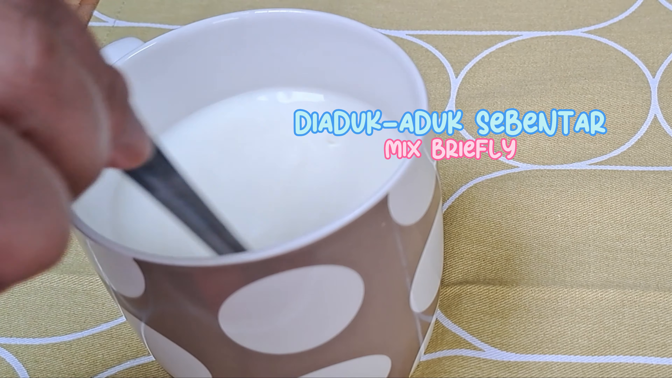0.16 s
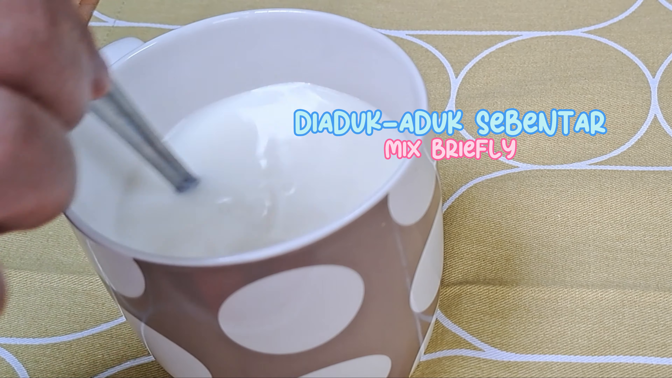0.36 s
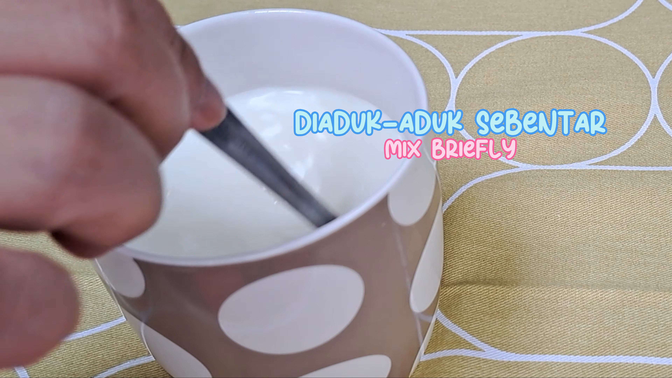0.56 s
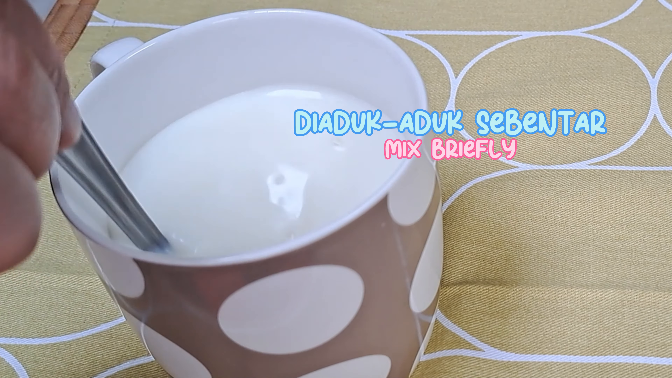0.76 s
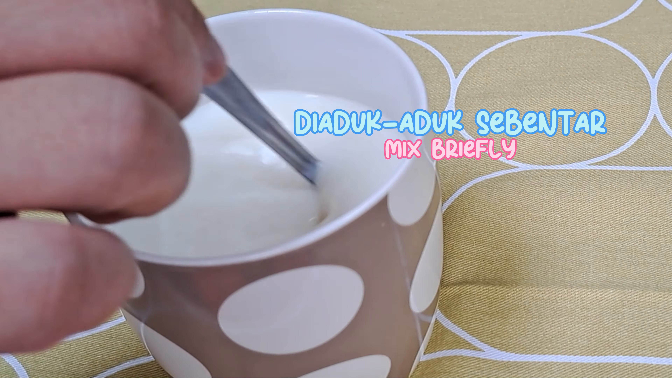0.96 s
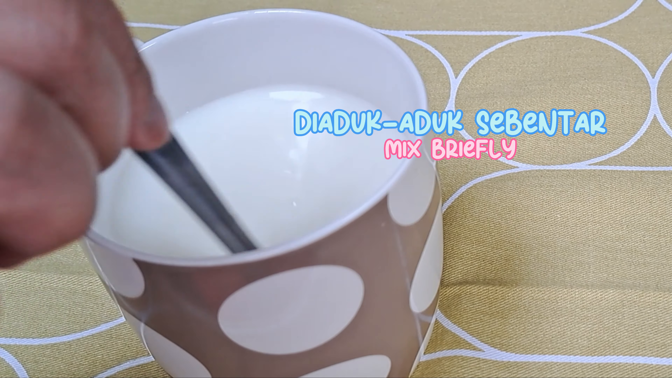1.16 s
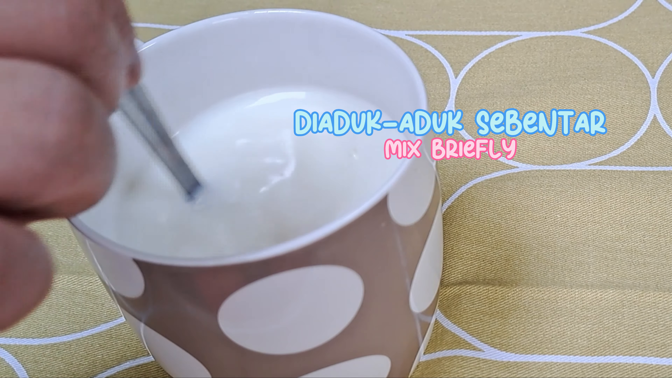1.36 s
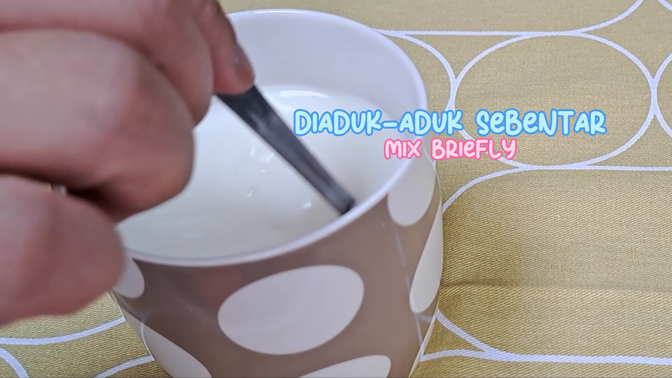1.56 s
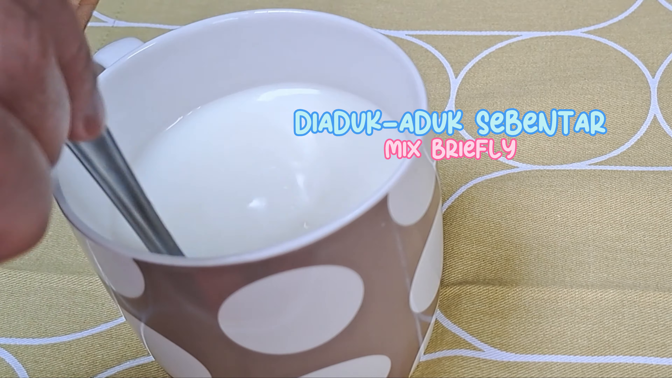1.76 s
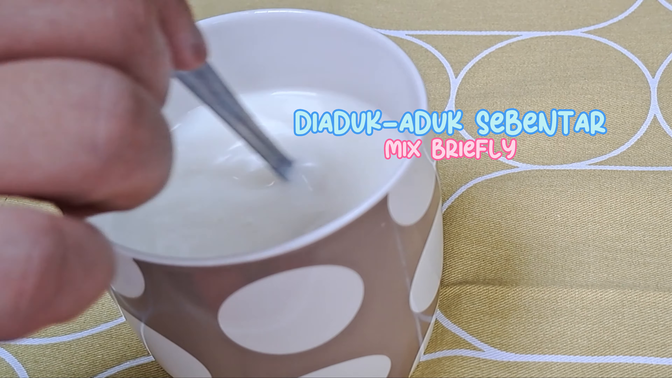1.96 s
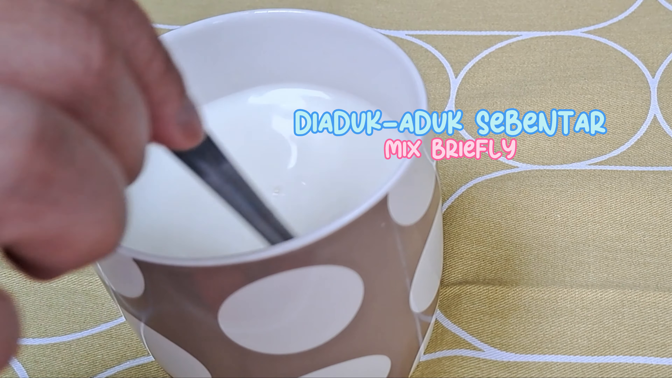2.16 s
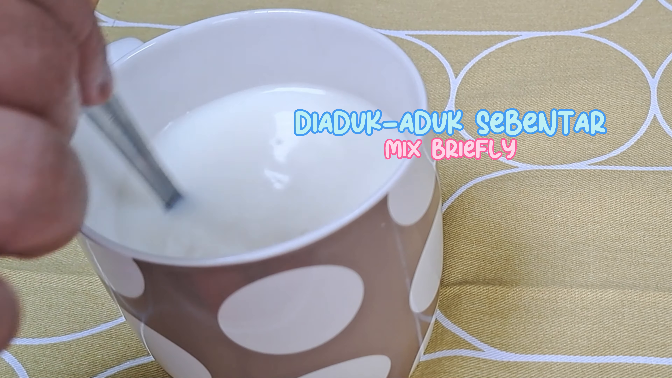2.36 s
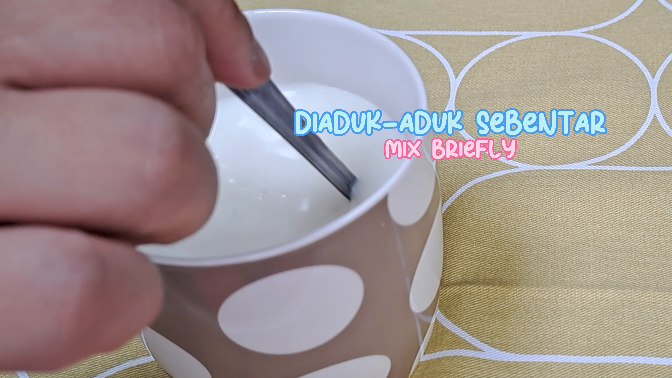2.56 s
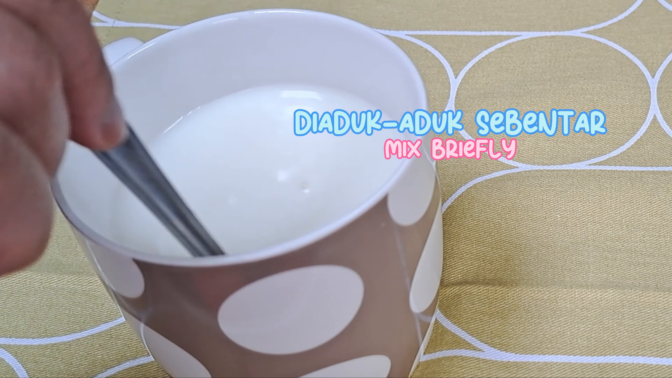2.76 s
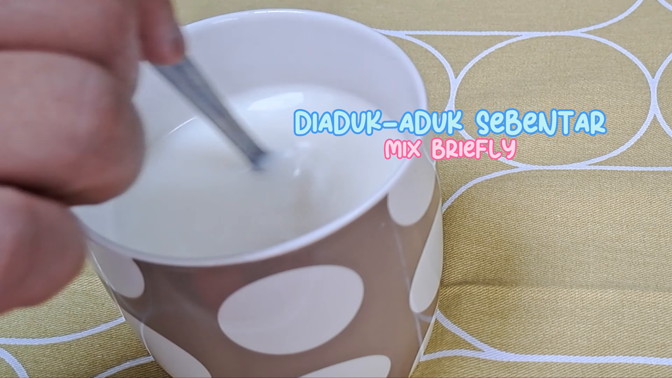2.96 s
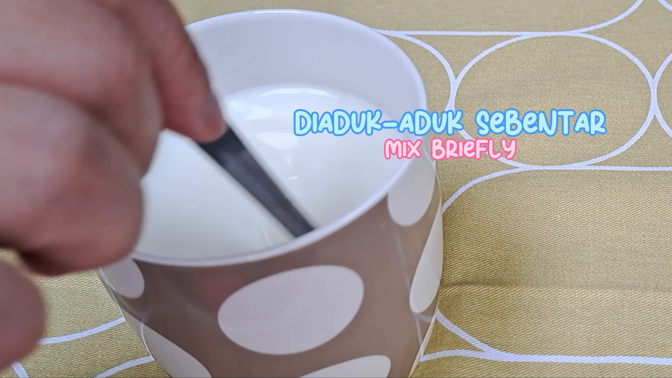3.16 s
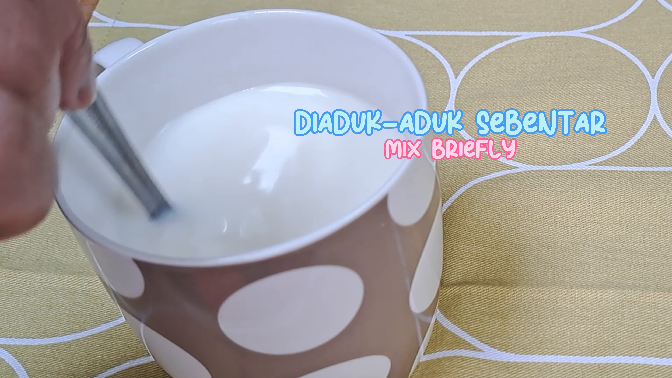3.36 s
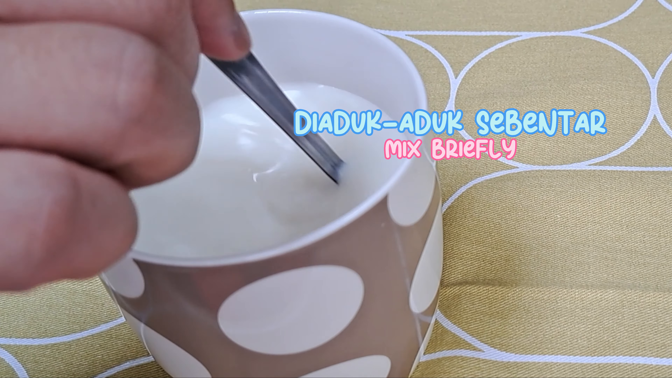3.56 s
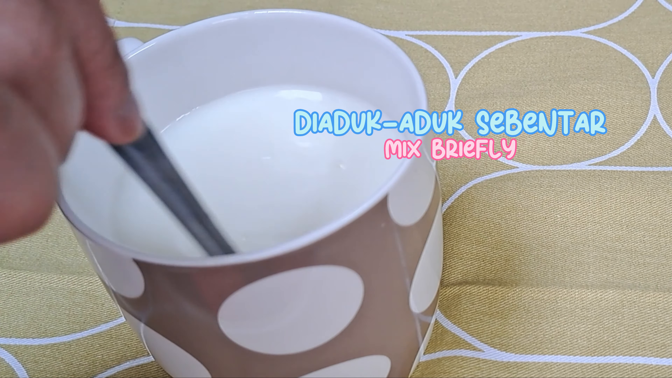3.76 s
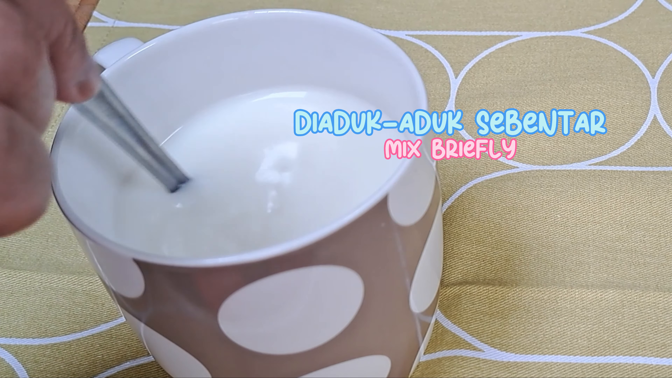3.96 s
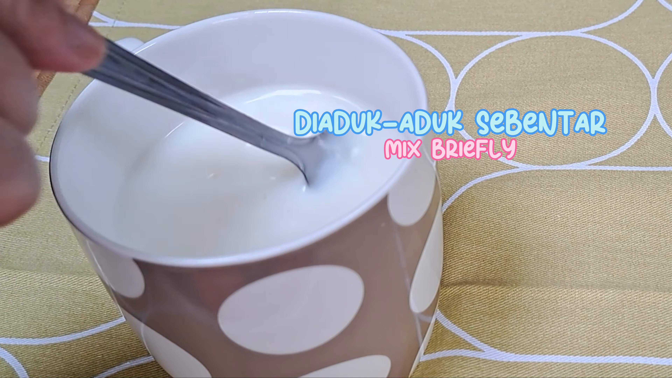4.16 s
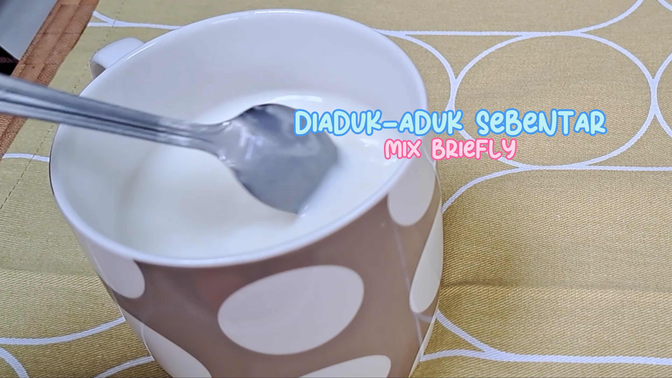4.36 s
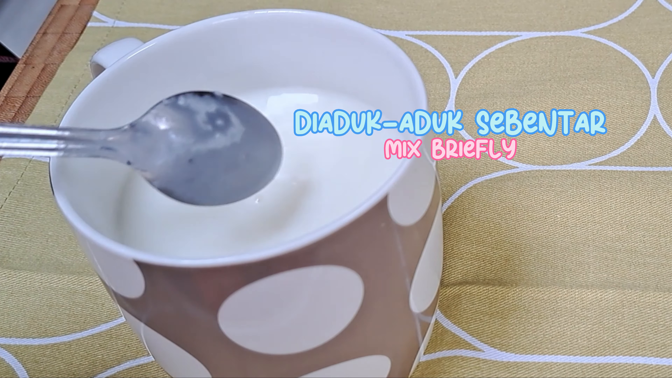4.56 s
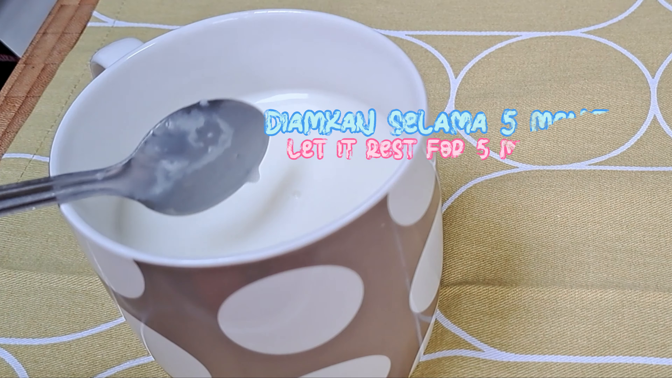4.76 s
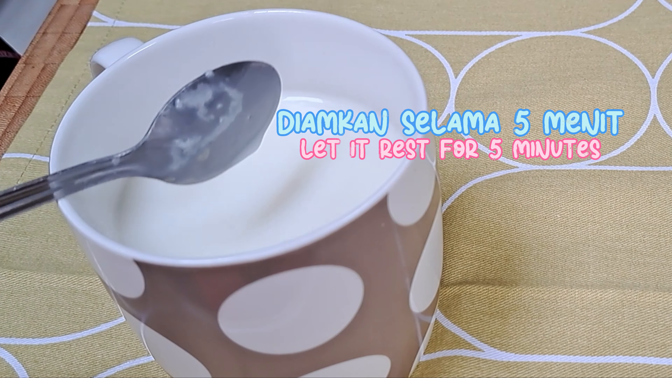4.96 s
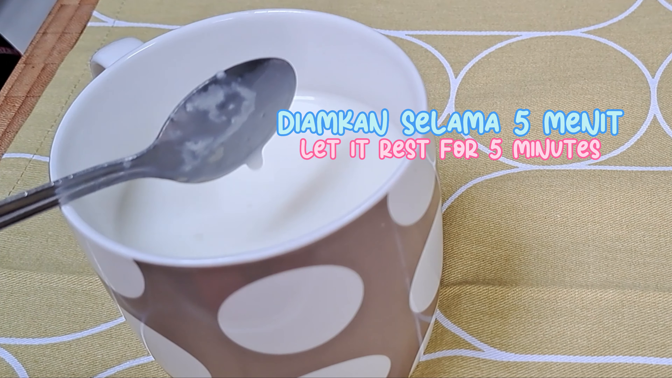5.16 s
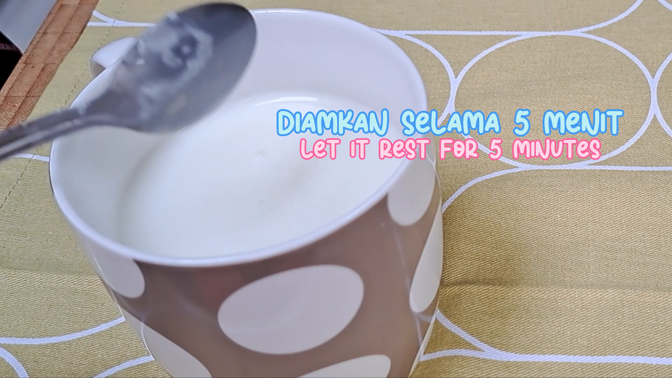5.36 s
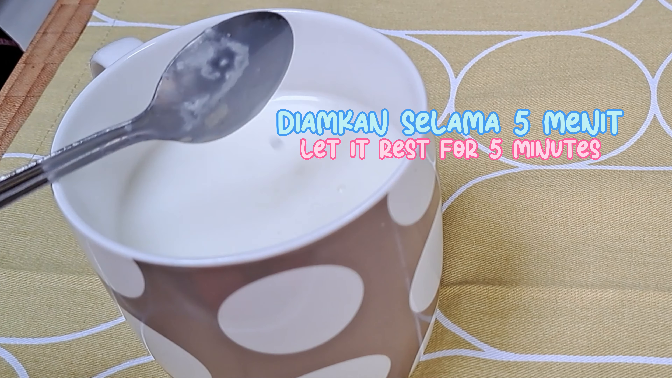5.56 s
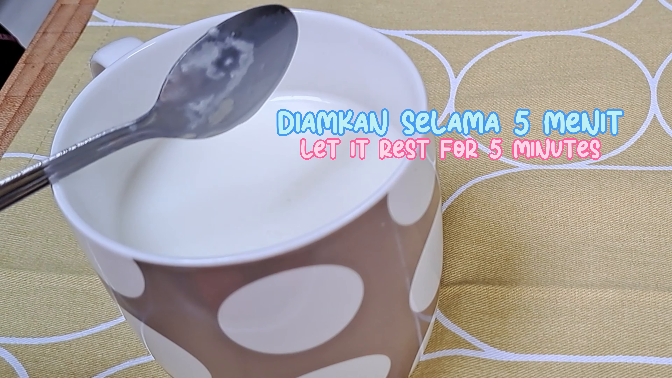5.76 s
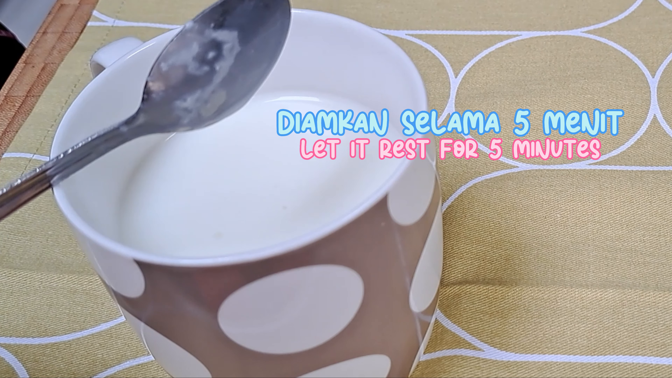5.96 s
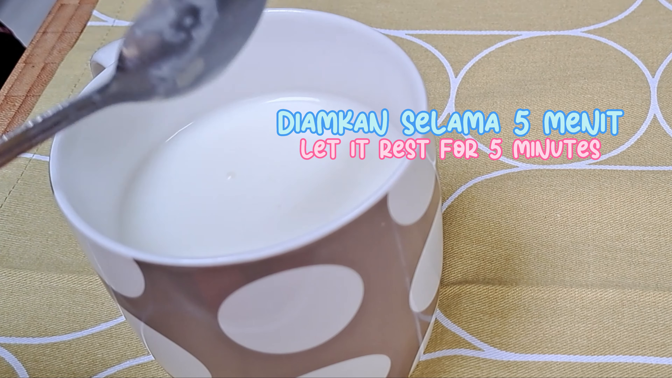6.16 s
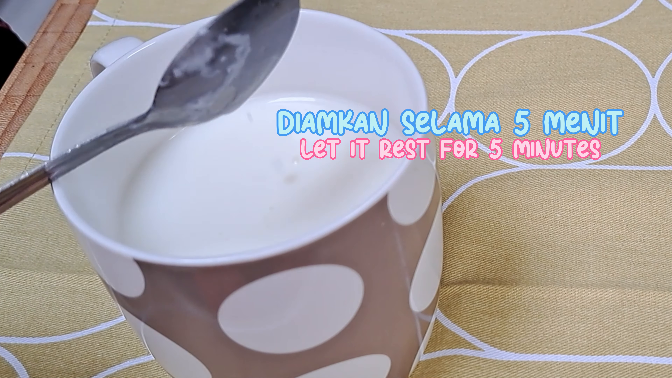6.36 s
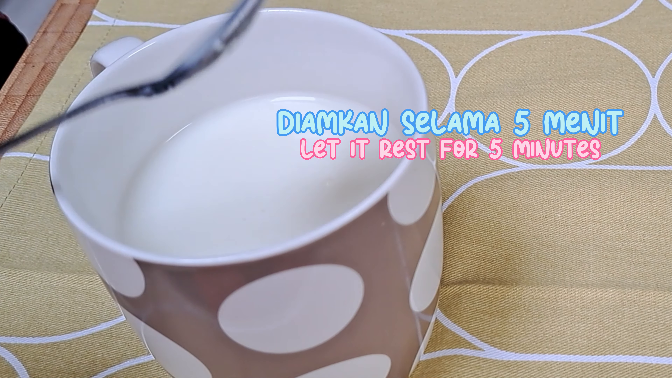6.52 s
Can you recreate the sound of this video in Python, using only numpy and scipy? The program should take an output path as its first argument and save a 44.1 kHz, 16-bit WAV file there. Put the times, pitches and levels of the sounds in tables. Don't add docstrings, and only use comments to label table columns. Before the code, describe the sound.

A metal spoon stirs milk in a ceramic mug with scraping and irregular clinks, then three loud ringing taps on the rim.

```python
import sys
import numpy as np
from scipy import signal
from scipy.io import wavfile
from scipy.ndimage import uniform_filter1d

SR = 44100
rng = np.random.default_rng(int(sys.argv[2]) if len(sys.argv) > 2 else 0)


def boost(x):
    u = np.asarray(x, float) / 20
    return 10 ** u


def to_wav(s):
    ch = np.atleast_2d(s).T
    pcm = np.round(np.clip(ch, -1, 1) * 32767)
    wavfile.write(sys.argv[1], SR, pcm.astype(np.int16))


N = 295029
STIR_END = int(5.25 * SR)
SIDES = np.array([[1], [-1]])


def rms_one(x):
    return x / np.sqrt(np.mean(x ** 2) + 1e-20)


def at_hz(points, hz):
    curve_hz, values = np.array(points).T[:2]
    return np.interp(np.log(hz), np.log(curve_hz), values)


def drift(rate):
    r = np.exp(-80 * np.pi * rate / SR)
    slow = signal.lfilter([1], [1, -2 * r, r * r], rng.standard_normal(N // 40 + 2002))
    slow = rms_one(slow[2000:])
    return np.interp(np.arange(N) / 40, np.arange(len(slow)), slow)


def band(x, low_hz, high_hz):
    return signal.sosfilt(signal.butter(2, [low_hz, high_hz], "band", fs=SR, output="sos"), x)


def mode(force, hz, t60, pan_db, lead):
    r, w = boost(-60 / (t60 * SR)), 2 * np.pi * hz / SR
    motion = signal.lfilter([1], [1, -2 * r * np.cos(w), r * r], force + 1e-18)
    before = np.concatenate([[0], motion[:-1]])
    ears = []
    for side in (.5, -.5):
        turned = np.sin(side * lead) * motion + r * np.sin(w - side * lead) * before
        ears.append(boost(side * pan_db) * turned)
    return np.array(ears)


# pitch_hz, level_db, t60_s, left_minus_right_db, left_leads_rad
MUG_STIRRED = [(1410, 2.5, 0.0247, 4, 0.96), (1330, -6, 0.046, 22.5, 2.1), (1540, 7.5, 0.023, -7.5, -0.053),
               (1988, -7, 0.079, 19, 1.9), (2060.7, 1.5, 0.26, 0, 0.23), (2430, -1, 0.012, 1, -0.56),
               (3140, -6, 0.034, 5, -0.55), (3310, -3, 0.035, 6.5, -0.84), (3376, -1, 0.023, 7.5, 0.048),
               (3470, -13, 0.068, -11, 0.84), (3365, -12, 0.028, -3, -2), (4110, -13, 0.0068, -12, 0.11),
               (4858, -4.5, 0.059, 7.5, 0.66), (4995, -2, 0.0047, 7, 1.5)]
# pitch_hz, level_db, t60_s, left_minus_right_db, left_leads_rad
SPOON_WET = [(5580, -0.5, 0.027, -5, 4.5), (5666, 2.5, 0.024, 7.5, -1.3), (6470, 3, 0.034, 8, 2),
             (7600, 11, 0.024, 12.5, 2), (8270, 4.5, 0.019, -12, -9.5), (9350, 9, 0.0083, 4.5, 11),
             (11790, 11, 0.018, -5, 3), (12800, 6, 0.023, -3, 0)]
PART_EDGES_HZ = [1850, 2200, 4100, 6200]
TOP_DAMPING = .4
# start_s, peak_db, ring_share_db, bowl_share_db, top_share_db
WALL_KNOCKS = [(0.1785, -22.5, -2, -11, -24), (0.342, -20.5, -14, -1, -26), (0.7904, -46, -19, 16, -33),
               (0.805, -36, -23, 10, -27), (0.979, -14, -16, -2.5, -17), (1.1605, -16.5, -52, -7, -12.5),
               (1.516, -31.5, -2, -4, -15.5), (1.6455, -25, 4.5, -9, -6), (1.8436, -34, -13, -3, -10),
               (2.18, -20.5, -38, -5.5, -10), (2.466, -26, -11, 9.5, -4.5), (2.8174, -32.5, 11.5, 7.5, -14),
               (3.018, -27, -27, -9, -23), (3.2113, -20, -31, -11, -6.5), (3.323, -20, -7, -8, -33),
               (3.354, -20, -16, -2, -23), (3.4337, -38, 11, 14, -7), (3.7428, -21, -2.5, -7, -6.5),
               (4.0618, -29, -9, -3.5, -0.5), (4.9580, -55, -37, 10, -35)]
# start_s, peak_db, ring_share_db, bowl_share_db, top_share_db
LOW_KNOCKS = [
    (0.2477, -42, -12, -8, -30),
    (0.4014, -30, -28, 6, -11),
    (0.9464, -29, -20, -2, -10),
    (1.9677, -20.5, -18, -15, -15),
    (2.459, -50, -5, 7, -15),
    (3.049, -35.5, -23, 7, -15),
    (3.197, -44, -13, -2, -14),
    (3.5032, -17.5, -26, -3.5, -10),
    (5.0579, -60, -16, 15, -23),
]
LOW_FLOOR_DB = [-12, -5, -8, -17, -6, -2, -8, -10.5, -4]
# start_s, peak_db, bowl_share_db
TICKS = [(.0228, -39, 1), (.155, -41, 10), (.2389, -31, -8), (.4026, -30.5, 7), (.5367, -38.5, 6),
         (.5741, -41, 3), (0.5917, -42, 10), (.853, -53, 0), (0.864, -46, 7), (1.296, -41, 2),
         (1.6307, -51, -2), (2.0637, -31, -2), (2.3494, -43, 0), (2.422, -42, 7), (2.7233, -39, 6.5),
         (2.8, -39, 3), (3.0954, -38, -2), (3.1487, -41, 0), (3.5882, -33, 0), (3.6371, -42, 0),
         (3.917, -41, 0), (3.9429, -37, 0)]


def stirring(gain_db, scatter_db, chatter_s, place_db, reach):
    knocks, modes = np.array(WALL_KNOCKS + LOW_KNOCKS), MUG_STIRRED + SPOON_WET
    floor_db = np.array([-34] * len(WALL_KNOCKS) + LOW_FLOOR_DB)
    shares_db = np.column_stack([floor_db, knocks[:, 2:4], 0 * floor_db, knocks[:, 4]])
    luck = rng.standard_normal((len(knocks), len(modes)))
    lags_s = rng.random((len(knocks), 3)) * chatter_s
    sizes = rng.uniform(-0.38, 1.0, (len(knocks), 3))
    hit_at = (knocks[:, 0] * SR).astype(int)
    again_at = ((knocks[:, :1] + lags_s) * SR).astype(int)
    tick_s, tick_db, tick_bowl_db = np.transpose(TICKS)
    grains, levels, favoured = drag_force(slips_per_s=4000, uneven_db=-1.0, catch_db=1.5, top_db=-24.5)
    out = np.zeros((2, N))
    for k, (hz, level_db, t60, pan_db, lead) in enumerate(modes):
        part = np.searchsorted(PART_EDGES_HZ, hz)
        is_wall = part == 1
        t60 = t60 * TOP_DAMPING ** (hz > PART_EDGES_HZ[3])
        rubbed = grains / np.sqrt(t60 * SR / (4 * np.log(1000)))

        wander = drift(5.1)[:STIR_END]
        place = levels[part] * boost(level_db + place_db * (not is_wall) * wander)
        away = np.log(favoured.get(part, hz) / hz) / reach
        place /= 1 + np.minimum(away ** 2, 6.0)
        if is_wall:
            purity = 2.0
            ring = mode(rubbed / np.sqrt(purity), hz, t60 * purity, pan_db, lead)
            steady = held(ring, hold_s=.03, firmness=0.83)
            out[:, :STIR_END] += place * band(steady, hz - 85, hz + 85)
            force = np.zeros(STIR_END)
        else:
            force = band(rubbed * place, hz * .93, hz * 1.07)

        strike_db = knocks[:, 1] + shares_db[:, part] + level_db + gain_db
        strength = boost(strike_db + scatter_db * luck[:, k])
        np.add.at(force, hit_at, strength)
        np.add.at(force, again_at, strength[:, None] * sizes)
        tick_share_db = [-10, -10, tick_bowl_db, 0, -11][part]
        force[(tick_s * SR).astype(int)] += boost(tick_db + level_db + gain_db + tick_share_db)
        out[:, :STIR_END] += mode(force, hz, t60, pan_db, lead)
    return band(out, 165, 18200)


# start_s, length_s, pressure_db, bowl_share_db, rasp_share_db
STROKES = [(0.0, 0.084, -45.5, 10.5, -7), (0.174, 0.09, -46, 3.5, 2), (0.424, 0.16, -57, 3, -7),
           (0.527, 0.18, -51.5, 6.5, -12), (0.692, 0.079, -52, 0, 0.5), (0.787, 0.076, -52, 5.5, -7),
           (0.963, 0.21, -50, 6, -3), (1.157, 0.16, -54.5, 0, 4), (1.288, 0.12, -55.5, 11.5, -13),
           (1.432, 0.16, -50, -6.5, -4), (1.517, 0.17, -51.5, 9.5, -4), (2.008, 0.15, -55, -3, 1.5),
           (2.198, 0.14, -49, -6, 1), (2.358, 0.24, -51, 4.5, -9), (2.51, 0.1, -50.5, 2, 2),
           (2.623, 0.12, -53.5, 1, -11), (2.725, 0.19, -52, -9, -5), (2.946, 0.14, -51.5, 2, -4),
           (3.035, 0.15, -51, 4.5, -7), (3.221, 0.073, -53.5, -2, 3), (3.352, 0.24, -51, 4, -5),
           (3.479, 0.16, -50.5, -7, 1), (3.615, 0.14, -55.5, 5.5, -3), (3.747, 0.12, -51, 0.5, 4.5),
           (3.89, 0.052, -52, 5.5, -3), (0.864, 0.026, -49, 0, -13), (2.785, 0.065, -44.5, -10, -15),
           (3.243, 0.045, -55, -4, -6), (0.11, 0.14, -52, 6.5, -19), (0.607, 0.1, -57, 4.5, -11),
           (1.716, 0.05, -60.5, -4, 4.5), (2.073, 0.086, -56.5, 7.5, -13), (3.135, 0.083, -63, -5, -15),
           (3.944, 0.027, -55, 6, 2), (4.952, 0.04, -68, 13, -2), (5.053, 0.03, -73, 3, -6)]
# start_s, length_s, level_db, sag_db
LEANS = [(0.0, 0.046, -34, 17), (0.066, 0.038, -35.5, 2), (0.188, 0.069, -28.5, 5.5), (0.307, 0.17, -78, 0),
         (0.473, 0.17, -40.5, 0.5), (0.692, 0.057, -38.5, 4), (0.805, 0.11, -44, 12),
         (0.984, 0.064, -34, 0), (1.14, 0.22, -32.5, 13), (1.437, 0.18, -49, -6), (1.641, 0.2, -38.5, 6.5),
         (1.838, 0.095, -57.5, -4), (1.982, 0.1, -51, -8), (2.15, 0.071, -35, -5), (2.276, 0.15, -44, 2.5),
         (2.471, 0.15, -38, 9), (2.616, 0.084, -43.5, 4), (2.74, 0.083, -40.5, 2), (2.933, 0.06, -66, 3),
         (3.027, 0.022, -38, -1.5), (3.122, 0.17, -39, -2.5), (3.213, 0.051, -25.5, 4.5),
         (3.358, 0.12, -39.5, 12), (3.52, 0.11, -34, 5.5), (3.652, 0.094, -48, -6), (3.745, 0.044, -28, 10),
         (3.836, 0.044, -31.5, 3.5), (3.915, 0.056, -46, 5.5), (4.065, 0.26, -42.5, 20.5),
         (0.56, 0.067, -49, 2), (1.058, 0.077, -41.5, 5), (1.249, 0.08, -43, -2), (1.755, 0.068, -46, -4),
         (2.53, 0.087, -48, -1), (3.594, 0.03, -39.5, 4), (3.79, 0.05, -39, 0)]
# time_s, pitch_hz
BOWL_PITCH = [(0.0, 3020), (0.17, 3130), (0.3, 3000), (0.59, 3140), (0.73, 3040), (0.96, 3310),
              (1.39, 3020), (1.45, 3460), (1.5, 3210), (2.0, 3180), (2.08, 3270), (2.56, 3480), (2.6, 3460),
              (3.29, 3310), (3.32, 3490), (3.89, 3240), (3.93, 3470), (4.1, 3440)]
# time_s, pitch_hz
FLOOR_PITCH = [(0.0, 1450), (0.09, 1340), (0.16, 1410), (1.21, 1454), (1.61, 1360), (1.64, 1480),
               (2.17, 1410), (3.16, 1410), (3.25, 1483), (3.6, 1350), (3.84, 1480), (3.9, 1380),
               (3.95, 1484), (4.1, 1410)]


def drag_force(slips_per_s, uneven_db, catch_db, top_db):
    sizes = boost(uneven_db * np.minimum(rng.exponential(1, N), 4)) * rng.choice([-1, 1], N)
    slips = rng.random(N) < slips_per_s / SR
    grains = rms_one(sizes * slips * boost(catch_db * drift(43)))[:STIR_END]
    start, length, press_db, bowl_db, rasp_db = np.transpose(STROKES)
    floor, bowl, rasp = [swells(start, length, press_db + share_db, sag_db=6, attack_s=0.068, release_s=0.0069)
                         for share_db in (0, bowl_db, rasp_db)]
    ring = swells(*np.transpose(LEANS), attack_s=0.074, release_s=.07)
    t = np.arange(STIR_END) / SR
    bowl_hz = np.interp(t, *np.transpose(BOWL_PITCH))
    floor_hz = np.interp(t, *np.transpose(FLOOR_PITCH))
    levels = [floor, ring, bowl, rasp, rasp * boost(top_db)]
    return grains, levels, {0: floor_hz, 2: bowl_hz, 3: 4930}


def swells(start, length, level_db, sag_db, attack_s, release_s, struck=True):
    t, power = np.arange(0, STIR_END + 64, 64) / SR, 1e-14
    opening = [row[0] for row in WALL_KNOCKS + LOW_KNOCKS if row[1] > -30]
    knocks = np.array(opening)
    reach_s, knock_rise_s = .025, .003
    for s, span, db, sag in np.broadcast(start, length, level_db, sag_db):
        near, rise = knocks[np.argmin(abs(knocks - s))], attack_s
        if struck and abs(near - s) < reach_s:
            s, span, rise = near + knock_rise_s, span + s - near, knock_rise_s
        corners_s = np.cumsum([s - rise, rise, span, release_s])
        shape_db = np.interp(t, corners_s, [-30, 0, -sag, -sag - 30])
        sounding = (t > s - rise) * (t < s + span + release_s)
        power = power + boost(db + shape_db) ** 2 * sounding
    return np.interp(np.arange(STIR_END) / SR, t, np.sqrt(power))


def held(ring, hold_s, firmness):
    swell = np.sqrt(uniform_filter1d(np.mean(ring ** 2, axis=0), int(hold_s * SR)) + 0.0067)
    return ring / swell ** np.clip(firmness, 0, 1)


# start_s, length_s, level_db, thin_hiss_share_db
SKIDS = [
    (0.473, 0.098, -59, -3),
    (0.713, 0.027, -53, -28),
    (0.793, 0.029, -53.5, -22),
    (1.46, 0.085, -54, -4),
    (2.24, .08, -55, -22),
    (2.522, 0.069, -58.5, 0.5),
    (2.776, 0.066, -44.5, -26),
    (2.986, 0.13, -66.5, 7),
    (3.786, 0.09, -51.5, -12),
    (4.942, 0.023, -59, -21),
]


def skids(grains_per_s, rough_db):
    hits = rng.random(STIR_END) < grains_per_s / SR
    grains = rng.standard_normal((3, STIR_END)) * hits * boost(rough_db * drift(30)[:STIR_END])
    pair = grains[0] + grains[1:]
    start, length, level_db, thin_db = np.transpose(SKIDS)
    out = np.zeros((2, N))
    for low, high, share_db in ((4100, 6120, 0), (6120, 14500, thin_db)):
        hiss = rms_one(band(band(pair, low, high), low, high))
        level = swells(start, length, level_db + share_db, 0, attack_s=.05, release_s=.05, struck=False)
        out[:, :STIR_END] += hiss * level
    return out * boost(2.0 * SIDES)


# start_s, peak_db, wall_sharper_per_mille
TAPS = [
    (4.7575, -10, 0),
    (5.5144, -2.5, 4),
    (6.2842, -4, 0.5),
]
STRUCK_LOW_HZ = [75, 125, 212, 620, 1350, 2003, 2086, 2900, 3540, 3640, 3695, 3790, 4300]
STRUCK_HIGH_HZ = [4895, 5015, 5660, 5780, 7300, 8300, 9590, 10800, 12000, 12850, 14400, 15100]
# t60_s, left_minus_right_db, left_leads_rad, tap_one_db, tap_two_db, tap_three_db
MUG_STRUCK = [(0.32, 0, 0.5, -39, -35, -35.5), (0.29, -1, 0, -33.5, -33.5, -34),
              (0.18, -2, -0.23, -26, -25, -25), (0.015, 1, 5, -20, -21, -22.5),
              (0.013, 3.5, 3.5, -15, -27, -18.5), (0.28, 7.5, 2.5, -14.5, -19, -22),
              (0.3, 3.5, 2.5, -13, -26, -28), (0.0083, 1, 2, -12.5, -12.5, -43),
              (0.0096, 14.5, 4, -14.5, -8, -12), (0.0087, -16.5, -14.5, -44, -12, -14.5),
              (0.3, -7.5, -2.5, -35, -39, -38), (0.038, 7, 2, -25, -25, -14),
              (0.0053, 12.5, 6, -47, -12, -43)]
# t60_s, left_minus_right_db, left_leads_rad, tap_one_db, tap_two_db, tap_three_db
SPOON_STRUCK = [(0.23, 13.5, -7.5, -17, -36, -27), (0.016, 7, -2.5, -0.5, -5, -10),
                (0.039, 15, 0, -26, -17.5, -18), (0.013, 9.5, 3, -26, -7.5, -7.5),
                (0.012, 3, 7, -6.5, -34, -10.5), (0.0075, 17.5, 8, -7.5, -28, -14.5),
                (0.039, -1, 4.5, -5.5, -10.5, -48), (0.018, 15.5, -2.5, -56, -28, -16.5),
                (0.0051, 11, -2.5, -9, -11, -46), (0.03, -1, -12, -13.5, -29, -24),
                (0.0092, -1, 13.5, -32, -26, -32), (0.006, 3, -2.5, -26, -15, -24)]
# pitch_hz, t60_s, left_minus_right_db, left_leads_rad, tap_one_db, tap_two_db, tap_three_db
LINGERING = [(3644, 0.35, 1, 1.9, -50, -39, -44), (3760, .35, 4, -1, -50, -40.5, -35),
             (4231, .25, 2, 1.5, -41, -51, -56), (5000, .4, 7, 1, -43, -41, -32.5),
             (4800, 0.34, 1, -2, -17, -48, -43), (5490, 0.55, -3, 1, -45, -39.5, -42),
             (5710, .42, 3.5, 2, -45, -42, -36), (6540, .2, -2, 1, -55, -60, -38),
             (7470, 0.2, 10, 0.71, -35.5, -56.5, -49), (8040, .25, -2.5, 1, -55, -55, -39),
             (8660, .17, -3, 1.6, -59, -56, -42), (9750, .22, 0, 1, -41, -35.5, -45)]
# t60_s, left_minus_right_db, left_leads_rad for the lower, then the upper
WALL_RING = [
    (.24, 8.1, 3, .2, 1, 1),
    (0.32, 11, -2, 0.24, 6.5, -1.9),
    (0.1, 11, 1.5, 0.15, 7, -1.1),
]
# start_s, level_db
GRAZES = [
    (4.948, -37),
    (5.06, -46),
    (5.14, -51),
]


def rim_taps(gain_db, contact_s, rebound):
    out = np.zeros((2, N + SR))
    pitches = STRUCK_LOW_HZ + STRUCK_HIGH_HZ
    modes = [(hz, *row) for hz, row in zip(pitches, MUG_STRUCK + SPOON_STRUCK)] + LINGERING
    loudest_wall_db = max(MUG_STRUCK[5][3], MUG_STRUCK[6][3])
    for hz, t60, pan_db, lead, *levels_db in modes:
        top = hz > PART_EDGES_HZ[3] and t60 < .1
        wall = PART_EDGES_HZ[0] < hz < PART_EDGES_HZ[1]
        for (s, peak_db, sharper), level_db, wall_pair in zip(TAPS, levels_db, WALL_RING):
            force = np.zeros(int(.62 * SR))
            at = int(0.86 / hz * SR)
            pitch = hz * (1 + sharper * wall / 1000)
            force[at] = boost(peak_db + level_db + gain_db + 3 * top)
            for k in (1, 2):
                force[at + int(k * contact_s * SR)] = rebound * force[at] * (hz > PART_EDGES_HZ[1])
            if wall:
                t60, pan_db, lead = np.reshape(wall_pair, (2, 3))[int(hz == STRUCK_LOW_HZ[6])]
                for graze_s, graze_db in GRAZES:
                    if s < graze_s:
                        force[int((graze_s - s) * SR)] = boost(graze_db + level_db - loudest_wall_db)
                fade = np.exp(-1 / (0.024 * SR))
                turn = np.exp(2j * np.pi * pitch / SR)
                force = 2 * signal.lfilter([1 - fade], [1, -fade * turn], force).real
            first = int(s * SR)
            out[:, first:first + len(force)] += mode(force, pitch, t60 * TOP_DAMPING ** top, pan_db, lead)
    return out[:, :N]


def cracks(events, gain_db, t60, low_hz, high_hz):
    force = np.zeros(N)
    force[[int(row[0] * SR) for row in events]] = boost([row[1] + gain_db for row in events])
    envelope = signal.lfilter([1], [1, -boost(-60 / (t60 * SR))], force)
    return band(envelope * rng.standard_normal((2, N)), low_hz, high_hz)


# pitch_hz, t60_s
ROOM_T60 = [(250, 0.59), (1000, 0.61), (4000, 0.4), (8000, 0.35), (13000, 0.32)]


def room(x, alike_below_hz):
    t = np.arange(int(.6 * SR)) / SR
    edges = np.geomspace(260, 17500, 8)
    white, tail = rng.standard_normal((2, len(t))), 0
    for low, high in zip(edges, edges[1:]):
        alike = 1 / (1 + (low / alike_below_hz) ** 2)
        pair = np.array([white[0], alike * white[0] + np.sqrt(1 - alike ** 2) * white[1]])
        tail = tail + band(pair, low, high) * boost(-60 * t / at_hz(ROOM_T60, np.sqrt(low * high)))
    tail *= np.clip((t - .003) / 0.0015, 0, 1)
    tail /= np.sqrt(np.sum(tail ** 2) / 2)
    tail *= boost(-.5 * SIDES)
    return signal.fftconvolve(x, tail, axes=1)[:, :N]


# pitch_hz, rms_db, left_minus_right_db, left_leads_rad
HUM = [
    (52, -65, 7, 0.13),
    (202, -58, -3, -1.6),
    (246.7, -66, -6, 0.12),
    (349.3, -55.5, -16, 1.63),
    (586, -63, -5, -0.52),
    (705.6, -58.5, 6, -1.23),
]
MIC_LOW_HZ = 41.6


def hum(waver_db, wander_rad):
    t, out = np.arange(N) / SR, 0
    for hz, level_db, pan_db, lead in HUM:
        phase = 2 * np.pi * hz * t + wander_rad * drift(2.0) + lead * SIDES / 2
        near = boost(pan_db * SIDES / 2 - abs(pan_db) / 2)
        unsteady = 6.5 if hz < 2 * MIC_LOW_HZ else 1
        level = np.sqrt(2) * boost(level_db + 1.5 + waver_db * unsteady * drift(4.6))
        out = out + level * near * np.sin(phase)
    return out


# pitch_hz, density_db_per_hz
AIR = [(25, -32), (50, -44), (110, -8), (190, -2.5), (300, -10.5), (450, -11.5), (690, -8), (1250, -12.5),
       (1900, -18.5), (4000, -33.5), (5900, -33), (7300, -29), (10000, -40.5), (14000, -32)]
# pitch_hz, likeness_0_to_1
AIR_LIKENESS = [(60, 0.92), (250, 1), (450, 1), (900, 0.04), (2500, 0.17), (12000, .05)]
# pitch_hz, left_minus_right_db
AIR_BALANCE = [(50, 17), (100, -4.5), (220, -1.5), (450, -10.5), (850, 3.5), (3000, 1.5), (12000, 3)]


def air(patchy_db):
    out, edges = 0, 25 * 2 ** np.arange(0, 9.6, .5)
    white = rng.standard_normal((2, 2, N))
    for k, (low, high) in enumerate(zip(edges, edges[1:])):
        mid, side = band(white[k % 2], low, high)
        hz = np.sqrt(low * high)
        alike = np.clip(at_hz(AIR_LIKENESS, hz), 0, 1)
        gain = boost(at_hz(AIR, hz) + patchy_db * drift(1.3) + at_hz(AIR_BALANCE, hz) / 2 * SIDES)
        out = out + gain * (np.sqrt(1 + alike) * mid + np.sqrt(1 - alike) * side * SIDES)
    return boost(-51) * rms_one(out)


def scene():
    stir = stirring(gain_db=-12.5, scatter_db=5.0, chatter_s=.004, place_db=2.5, reach=0.073)
    stir += cracks(WALL_KNOCKS + LOW_KNOCKS, gain_db=-5.0, t60=0.024, low_hz=1000, high_hz=7700)
    stir += skids(grains_per_s=2400, rough_db=4.5)
    taps = rim_taps(gain_db=0.5, contact_s=0.0007, rebound=0.24)
    taps += cracks(TAPS, gain_db=-13, t60=0.012, low_hz=2800, high_hz=10000)
    taps += cracks(TAPS, gain_db=-16.0, t60=0.013, low_hz=12000, high_hz=18000)
    sent = stir + boost(-0.5) * taps
    sent = sent - .75 * band(sent, *PART_EDGES_HZ[:2])
    reverb = boost(-3) * room(sent, alike_below_hz=540)
    return stir + taps + reverb + hum(waver_db=0.5, wander_rad=0.86) + air(patchy_db=1.0)


def low_pass(x):
    return signal.sosfilt(signal.butter(12, 16640, fs=SR, output="sos"), x)


def record(dry):
    heard = signal.sosfilt(signal.butter(4, MIC_LOW_HZ, "high", fs=SR, output="sos"), dry)
    rounded = 1.2 * np.tanh(heard / 1.2)
    cut = signal.sosfilt(signal.cheby2(14, 26, 15950, fs=SR, output="sos"), rounded)
    mix = np.clip(cut, -.97, .97)
    return low_pass(mix)


dry = scene()
out = record(dry)
to_wav(out)
```